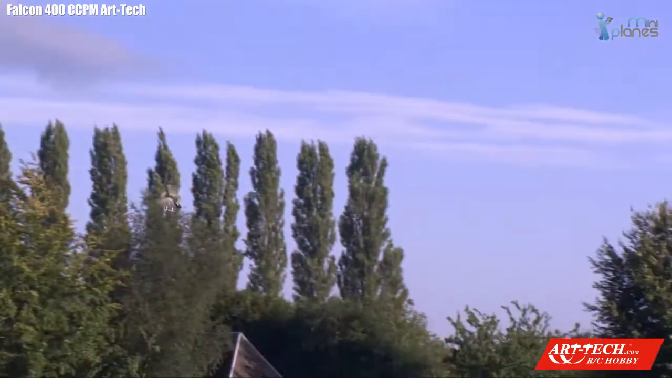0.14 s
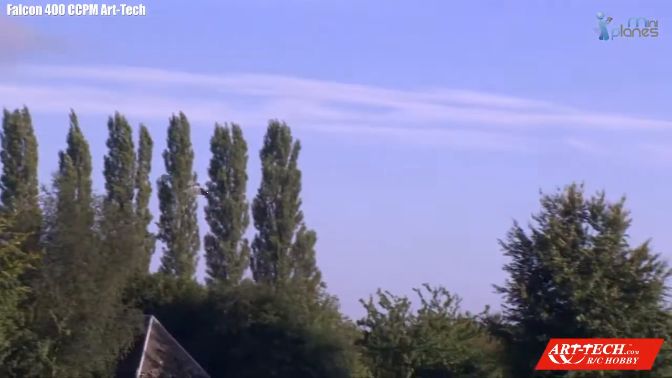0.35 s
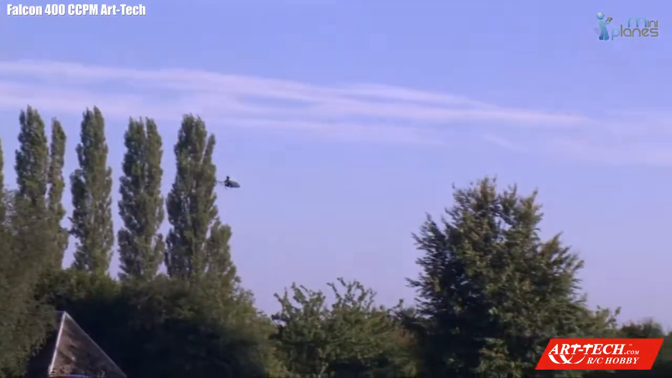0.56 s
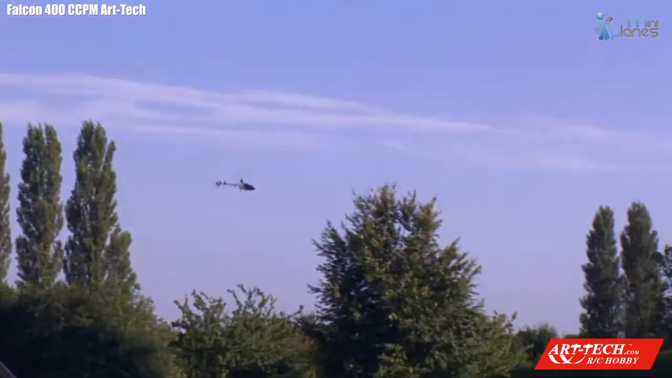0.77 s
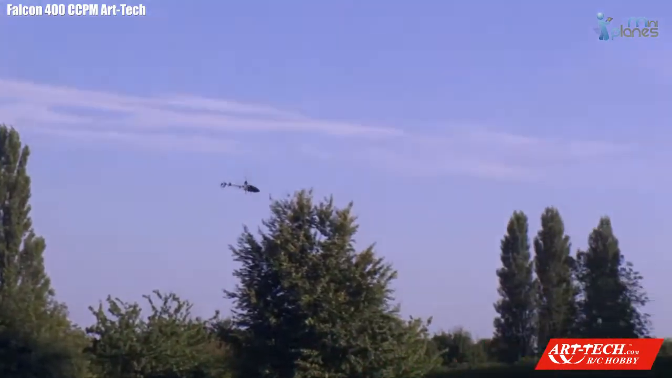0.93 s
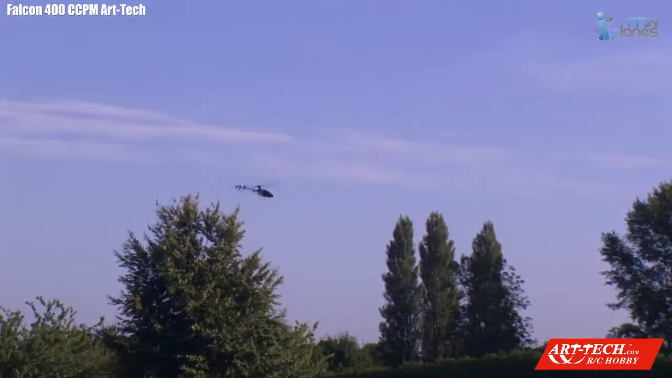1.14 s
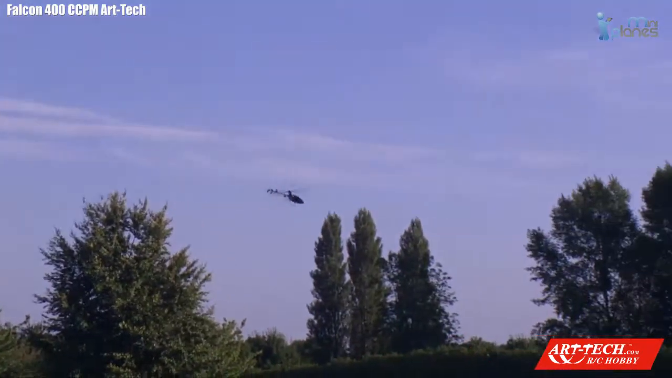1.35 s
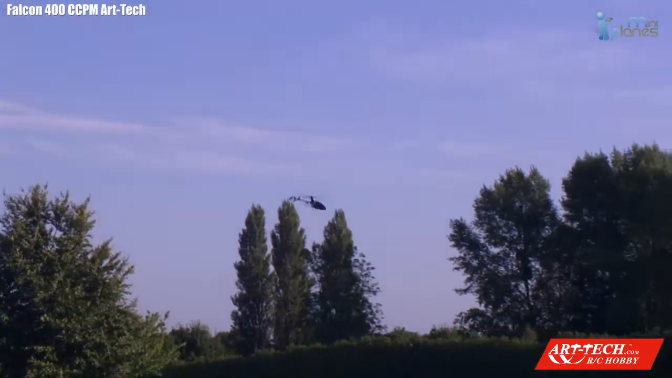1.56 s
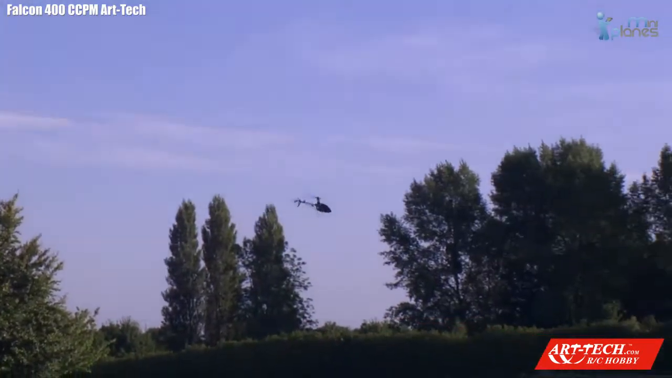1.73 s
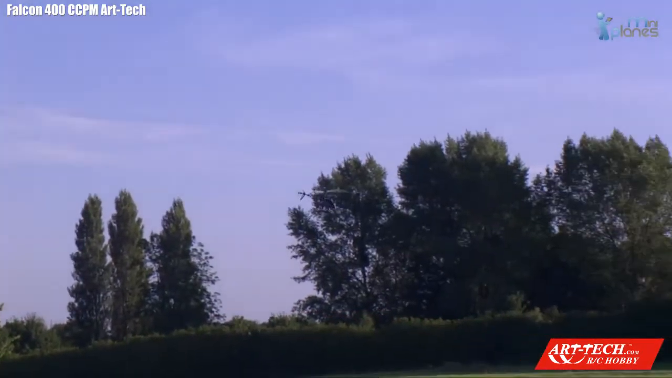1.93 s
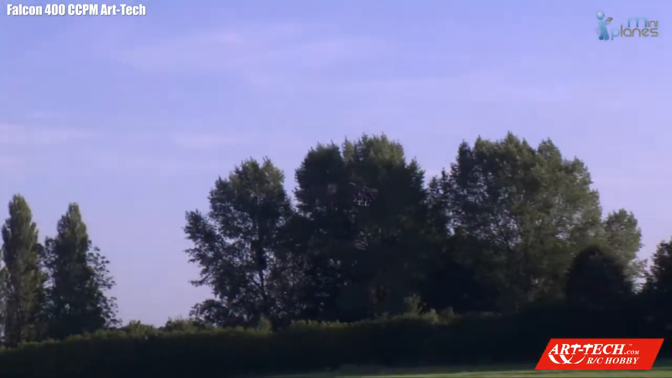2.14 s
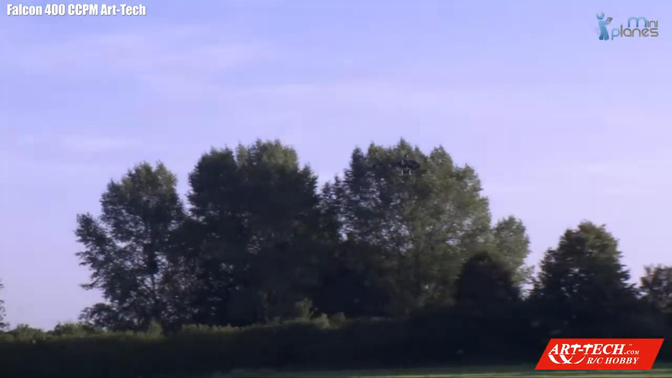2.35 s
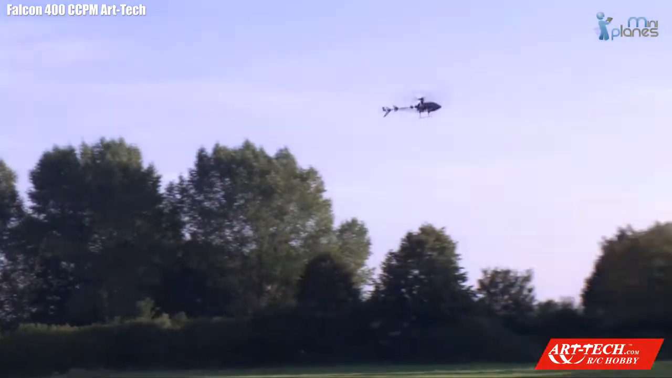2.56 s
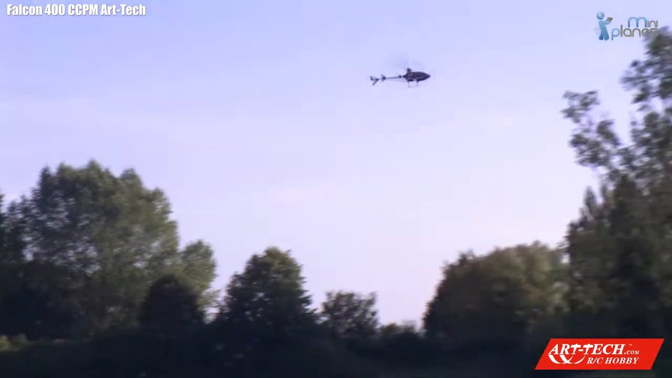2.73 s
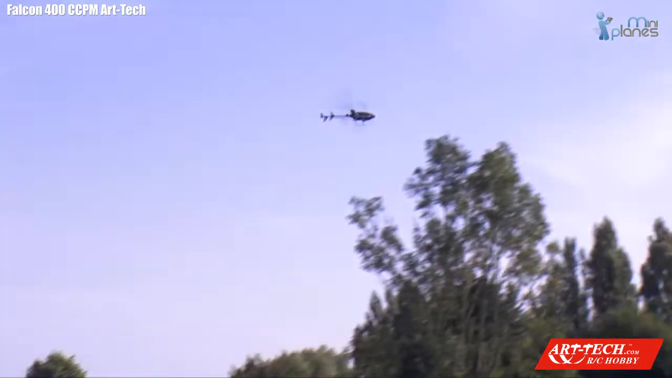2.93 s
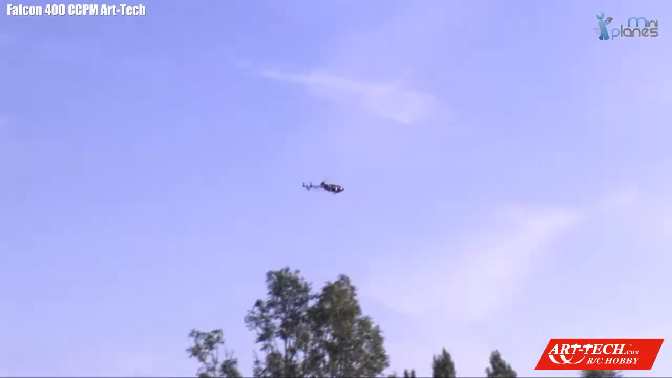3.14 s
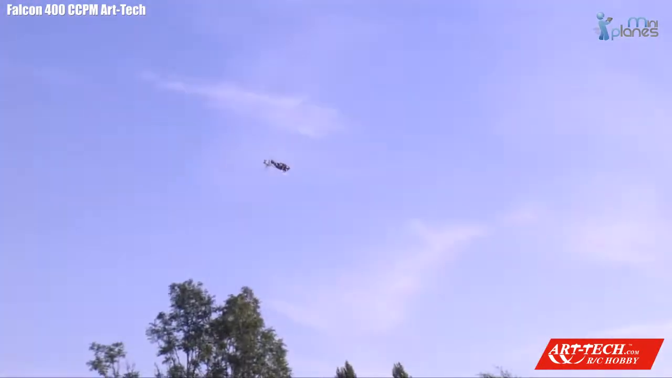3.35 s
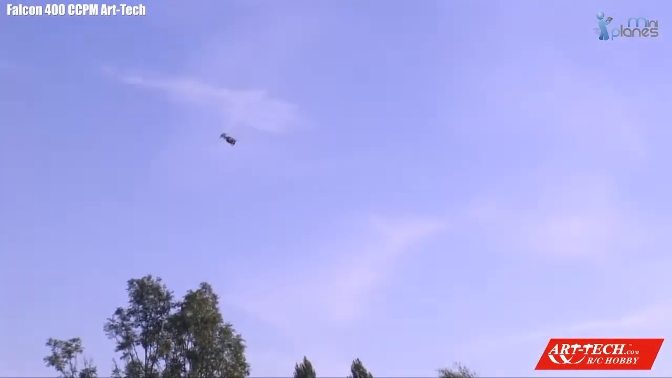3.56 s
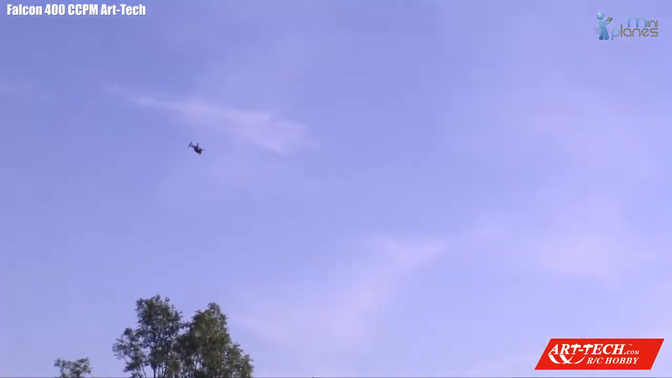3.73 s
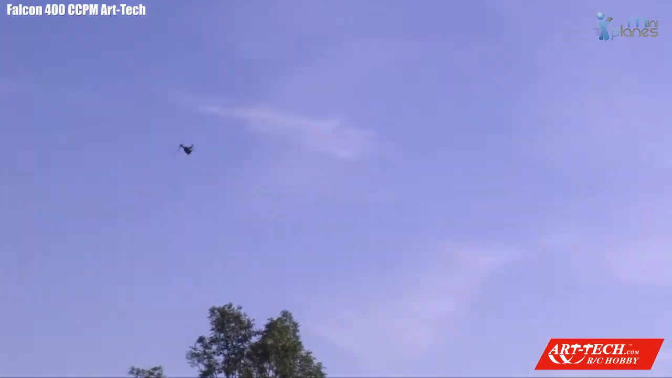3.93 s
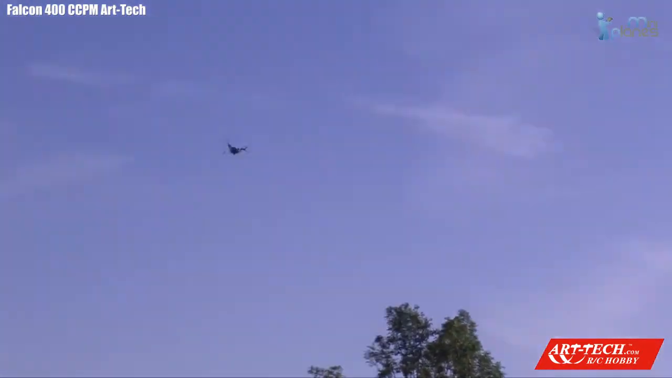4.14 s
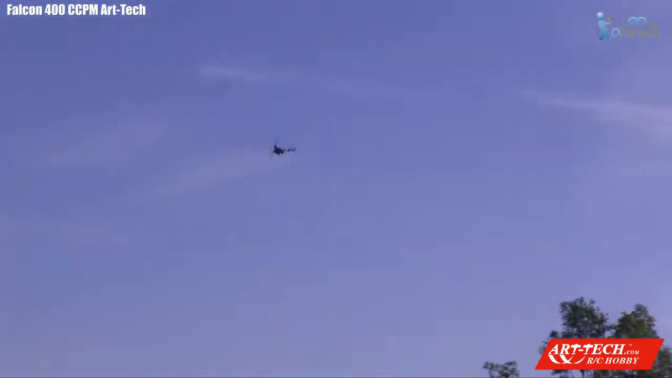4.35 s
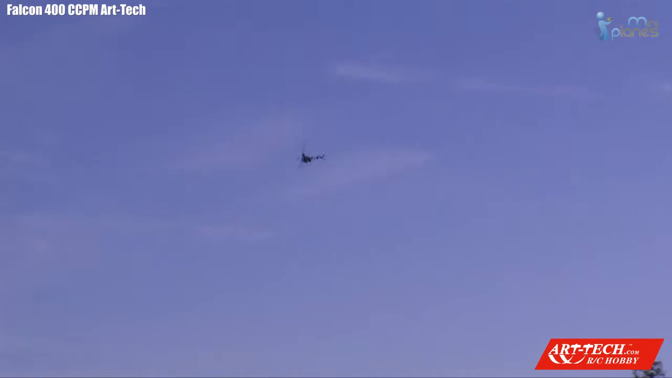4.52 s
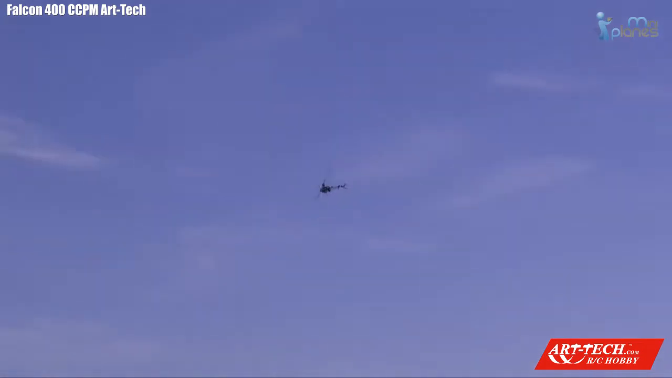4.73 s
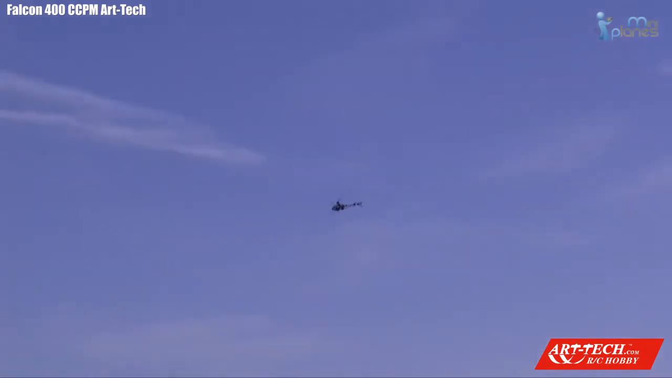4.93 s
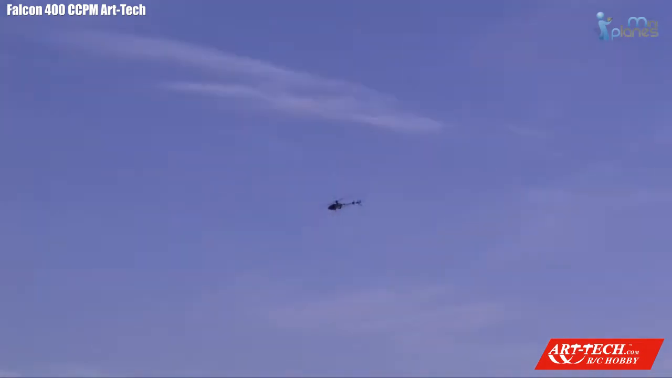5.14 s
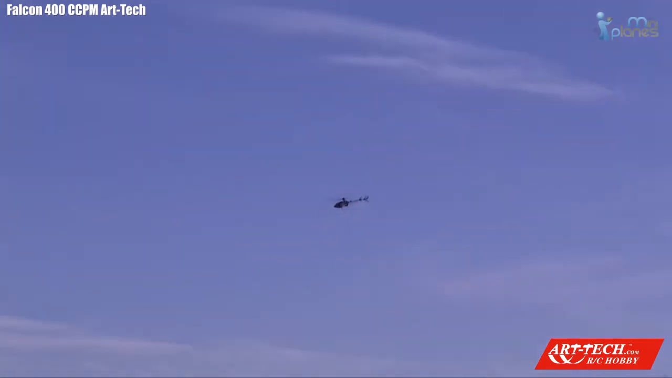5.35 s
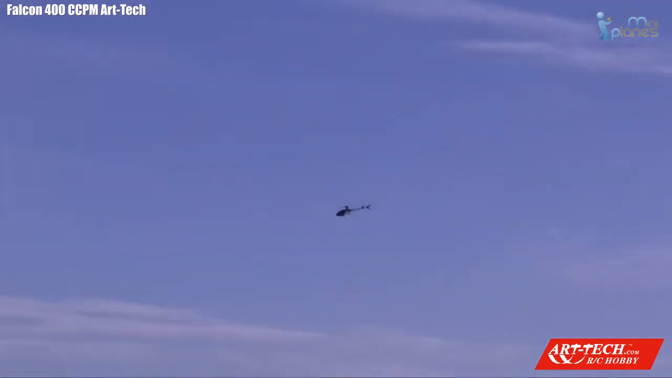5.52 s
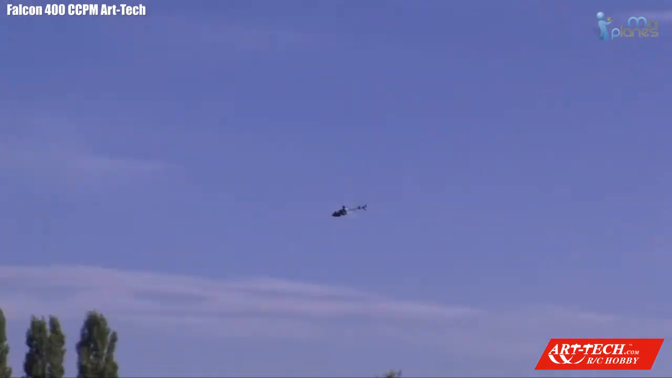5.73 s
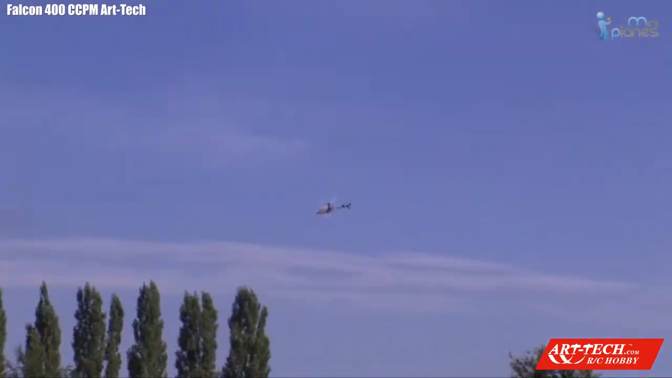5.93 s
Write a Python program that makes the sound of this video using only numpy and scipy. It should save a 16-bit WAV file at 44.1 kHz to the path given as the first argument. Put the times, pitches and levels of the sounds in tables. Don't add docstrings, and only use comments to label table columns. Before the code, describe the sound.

Shrill motor and gear whine rides on fluttering airy hiss as a toy-sized helicopter circles, while low gusts thump the microphone.

```python
import sys
import numpy as np
from scipy import signal
from scipy.fft import rfft, irfft, next_fast_len
from scipy.io import wavfile
from scipy.ndimage import uniform_filter1d, map_coordinates

SR = 44100
rng = np.random.default_rng(int(sys.argv[2]) if len(sys.argv) > 2 else 0)


def wav_record(signal):
    frames = np.transpose(np.atleast_2d(signal))
    bounded = np.clip(frames, -1, 1)
    quanta = np.round(bounded * 32767).astype(np.int16)
    wavfile.write(sys.argv[1], SR, quanta)


def attenuation_scalar(level_db):
    decades = np.asarray(level_db, float) / 20
    return 10 ** decades


N = 263718
MOTOR_TURNS_PER_ROTOR_TURN = 13.2

# time_s, speed_turns_per_s
SHAFT_SPEED = [(0, 560.4), (.36, 563.8), (.85, 541.8), (1, 540.2), (1.13, 541.6), (1.4, 538), (1.6, 538.4),
               (1.94, 558.6), (2.4, 558.8), (2.68, 534.5), (2.93, 522), (3.25, 525.9), (3.6, 531.8),
               (4.03, 536.9), (4.3, 532.6), (4.5, 525.2), (5.15, 525.4), (5.98, 548)]
# peak_s, level_db, lasts_s
MESH_LOBES = [(0, -53, .07), (.72, -54.5, 0.26), (1.1, -46.5, 0.17), (1.4, -46.5, 0.21),
              (1.64, -51.5, 0.11), (1.87, -49, 0.058), (2.33, -44.5, 0.068), (2.55, -44, 0.092),
              (3, -39.5, 0.048), (3.12, -36, 0.087), (3.38, -38.5, 0.1), (3.72, -45, 0.11),
              (4.15, -52, 0.22), (4.72, -51, 0.33), (5.02, -45, 0.081), (5.22, -48, 0.07),
              (5.31, -45, 0.048), (5.67, -53.5, .08), (5.9, -58, 0.13)]
FIFTH_LOBES = [(0, -56, 0.085), (.29, -48, 0.18), (.85, -61, 0.18), (1.15, -50.5, 0.17),
               (1.44, -51.5, 0.049), (1.66, -51, 0.1), (2.12, -56, 0.16), (2.33, -55, 0.059),
               (2.57, -55, .05), (2.69, -41.5, .1), (3, -45, 0.063), (3.2, -54, 0.21), (3.44, -46.5, 0.12),
               (3.95, -59, 0.13), (4.2, -60, 0.13), (4.5, -56, 0.12), (4.98, -53, 0.06),
               (5.14, -51.5, 0.078), (5.78, -54.5, 0.091), (5.98, -48.5, 0.083)]
HALF_LOBES = [(.05, -55, 0.14), (.52, -54, 0.11), (1, -60, .1), (1.33, -56, 0.15), (1.56, -48, 0.048),
              (1.78, -49.5, 0.16), (2.04, -48.5, 0.084), (2.33, -52, 0.049), (2.87, -60, .12),
              (3.15, -60, 0.13), (3.46, -56, .1), (3.67, -54, 0.061), (4.44, -55.5, 0.23), (4.8, -59, 0.22),
              (5.73, -56, 0.14)]
# peak_s, level_db, lasts_s
SHELL_8_LOBES = [
    (.2, -59, .33),
    (1.05, -64, 0.33),
    (2.06, -61.5, 0.23),
    (2.915, -53, 0.028),
    (3.65, -52, 0.054),
    (3.72, -50.5, .05),
    (3.82, -50, 0.14),
    (4.1, -58, 0.12),
    (5, -65, 0.19),
]
SHELL_9_LOBES = [
    (0, -51, 0.17),
    (1.8, -65, .14),
    (2.2, -62, .17),
    (2.62, -52.5, 0.12),
    (2.95, -57, .25),
    (3.37, -53, .13),
    (4.12, -54.5, .27),
    (4.65, -56, 0.31),
    (5.2, -57, .14),
    (5.62, -58, 0.14),
]
SHELL_12_LOBES = [
    (.22, -54, .17),
    (.66, -56, 0.36),
    (2.03, -49.5, 0.083),
    (2.28, -53.5, 0.17),
    (3, -64, .15),
    (3.42, -68, .2),
    (3.83, -52, 0.19),
    (4.16, -53, 0.21),
    (5.3, -54, .14),
    (5.72, -50, 0.22),
]
# shaft_order, level_db, peak_s, lasts_s
FAINT_TONES = [(1, -51, 2.5, .25), (1, -56, 1.95, .25), (1, -56, .15, .28), (1, -64, 1.2, .25),
               (1.102, -56, 2.05, .3), (1.102, -58, 1.2, .3), (.828, -62, .3, .35), (.828, -64, 1.25, .2),
               (.828, -63, 2.05, .3), (1.21, -62, 1.8, 1.5), (2.2, -62, 2.1, .35), (2, -59, 2.75, .3),
               (4, -61, 3.2, .8), (4, -63, .3, .5), (6, -64, 4.2, .4), (10.3, -56, 4.65, .18),
               (9.39, -57, 3.5, .4), (10.39, -59, 3.2, .6), (10.61, -60, 4.2, .8), (10.61, -61, .3, .4),
               (11, -60, 1.9, .6), (11, -62, .3, .4), (11, -63, 5.3, .7), (11.61, -63, 3.2, .4),
               (12.61, -63, 3, 1), (12.61, -61, 5.8, .4), (13, -57, 2.9, .4), (13, -59, 1.6, .5),
               (13, -59, 5.8, .4), (14, -62, 2.8, .4), (18, -66, 2.3, .3), (18, -66, 3.5, .3),
               (20, -60, 3.7, .35), (21, -64, 3.6, .25), (6, -59, 2.55, .15), (7, -63, 4.9, .4),
               (7, -66, .75, .2), (4.5, -62, 3.9, .3), (5.21, -60, 4.05, .15), (9.5, -58, 2.25, .15),
               (9.5, -58, 5.85, .15), (9.71, -60, 4.65, .15), (11.58, -60, .75, .2), (14, -60, 1.05, .15),
               (17.4, -64, 2.1, .3), (17.4, -63, 3.45, .15), (18, -65, .4, .4), (18, -64, 4.4, .25),
               (19, -61, 3.45, .15), (22, -61, 3.7, .25)]
# shaft_order, width_hz, level_db, peak_s, lasts_s
PANEL_HISS = [
    (14.6, 1100, -47, 2.8, 0.34),
    (4.25, 130, -52.5, 2.94, 0.39),
    (5.4, 99, -56, 3.9, 0.48),
    (12.4, 400, -48, 2.44, 0.15),
    (3.3, 390, -58, 1.62, 1),
]
MESH_DROPOUTS = [1.04, 1.25, 1.4, 2.44, 2.96, 3.085, 3.22, 3.26, 3.41, 3.54, 3.58, 5.125]
# freq_hz, density_db
HUM_SPECTRUM = [(300, -30), (480, -3), (600, 5), (720, -0.5), (900, -57)]
BLADE_SPECTRUM = [(250, -6), (500, -13.5), (1000, -2), (1700, -6), (2300, -2.5), (2750, -2), (3300, -5),
                  (4000, -7), (5000, -32.5)]
GEAR_HISS_SPECTRUM = [(3600, -18.5), (4400, -6.5), (5300, 0.5), (6000, -2.5), (6800, 0.5), (7800, -4),
                      (8800, -5), (9800, -10.5)]
TIP_SPECTRUM = [(7500, -1), (9000, -6), (10000, 2), (11000, 3.5), (12500, -5)]
# time_s, nearness_db
FLIGHT_PATH = [(0, -0.5), (.45, .5), (.6, -1.5), (1.05, 0), (1.2, 1), (1.4, -1.5), (1.95, 2), (3.1, 2),
               (3.3, -1.5), (3.45, 0), (3.6, -3.5), (4.7, -5.5), (5.4, -3), (5.98, -2)]
# peak_s, gear_hiss_db, tip_hiss_db, lasts_s
DISC_TILTS = [(0, -48, -57, 0.2), (0.305, -46, -54.5, 0.21), (0.79, -51, -54.5, 0.23),
              (1.17, -45, -51.5, 0.22), (1.498, -56, -54, 0.15), (1.623, -43.5, -52.5, 0.12),
              (1.97, -46.5, -52.5, 0.17), (2.51, -41.5, -49.5, 0.21), (2.9, -46.5, -49, 0.087),
              (3.108, -40.5, -52, 0.2), (3.425, -41, -50.5, 0.11), (3.73, -45, -48.5, 0.16),
              (4.047, -49.5, -66, 0.14), (4.35, -50.5, -57.5, 0.32), (4.71, -54, -52.5, 0.16),
              (5, -48, -56, 0.069), (5.16, -44, -58, 0.045), (5.545, -50, -56, 0.073),
              (5.838, -51.5, -76, .08)]
# freq_hz, level_re_shared_db
SCATTER_SPECTRUM = [(60, -7), (340, -22), (620, -44), (1100, -13), (1980, -34), (3540, -32), (5200, -17),
                    (7500, -13.5), (9300, -4), (10500, -2.5), (11300, -4), (12200, -8)]
# time_s, extra_delay_ms, strength_db
GRASS_PATH = [(0, 1.47, -1), (.5, 1.36, -2), (1.3, 1.45, -1), (2.1, 1.36, -2), (2.6, 1.9, -3),
              (3.2, 2.58, 0), (3.6, 2.78, 2), (4, 2.85, 2.5), (4.6, 2.8, 3), (5, 2.7, 4), (5.4, 2.45, 3),
              (5.98, 2.2, 4)]
# freq_hz, gain_db
GRASS_RESPONSE = [(20, -11), (1500, -8), (2600, -7), (3600, -9.5), (6000, -14), (13000, -20)]
# freq_hz, density_db
FIELD_SPECTRUM = [(15, -51), (28, -24), (60, -6), (181, -4), (384, -6.5), (642, -2.5), (830, -3),
                  (1730, -9), (2000, -9.5), (2600, -42), (4400, -120)]
# peak_s, thud_db, flutter_db, lasts_s
GUST_SWELLS = [(1.444, -66, -83, 0.53), (2.493, -48, -60, 0.091), (2.69, -41, -43, 0.048),
               (2.85, -26.5, -34.5, 0.056), (3.009, -30.5, -21.5, 0.066), (3.132, -31, -31, 0.057),
               (3.275, -37, -39.5, 0.013), (3.381, -28.5, -26, 0.036), (3.447, -34, -25.5, 0.025),
               (3.54, -34, -35, .04), (3.621, -30, -28.5, 0.024), (3.705, -31, -26.5, 0.016),
               (3.826, -28.5, -27, 0.09), (4.006, -31.5, -39, 0.067), (4.185, -34, -50, 0.11),
               (4.344, -36.5, -40, 0.068), (4.486, -43, -50, 0.079), (4.772, -44, -49, 0.022),
               (4.927, -54.5, -58, .07), (5.27, -59, -58, 0.056), (5.536, -50.5, -54.5, 0.17),
               (5.98, -43, -48, 0.033)]
# freq_hz, density_db
THUD_SPECTRUM = [(20, -40), (50, -20), (90, -3.5), (130, 0.5), (180, -7), (260, -13.5)]
FLUTTER_SPECTRUM = [(110, -26), (170, 4), (230, 0), (340, -7.5), (450, -17.5), (650, -23), (1000, -42),
                    (1500, -46)]
# time_s, peak_db, pitch_hz, port_sign (+1 left, -1 right)
EDDY_POPS = [(2.8415, -16.5, 298, 1), (2.8766, -15, 450, -1), (2.965, -12, 252, -1), (2.98, -16, 282, 1),
             (3.0329, -11, 326, 1), (3.3627, -19, 280, -1), (3.3873, -16, 292, -1), (3.414, -31, 300, 1),
             (3.5989, -8, 232, -1), (3.623, -17, 330, -1), (3.7041, -16, 248, -1), (3.709, -16, 248, 1),
             (3.841, -19, 200, -1), (3.046, -10.5, 250, 1), (3.108, -18, 220, -1), (3.444, -18, 219, -1),
             (3.968, -28, 150, 1), (4.017, -28, 160, -1), (4.248, -26, 140, 1), (4.349, -24, 215, -1),
             (2.993, -17, 230, 1), (3.02, -18, 260, -1), (4.954, -38, 310, 1), (5.385, -34, 170, -1),
             (3.788, -21, 231, -1)]
# freq_hz, gain_db
LEFT_CAPSULE = [(5, 0), (7500, .1), (9500, 1.5), (10800, .1), (22000, .1)]
RIGHT_CAPSULE = [(5, 0), (7500, -.1), (9500, -1.5), (10800, -.1), (22000, -.1)]


def unit(x):
    return x / np.sqrt(np.mean(x ** 2) + 1e-20)


def curves(rows):
    time_s, *columns = np.transpose(rows)
    return [np.interp(np.arange(N) / SR, time_s, column) for column in columns]


def wobble(rate_hz):
    knots = rng.standard_normal(int(N * rate_hz / SR) + 4)
    return map_coordinates(knots, [np.arange(N) * rate_hz / SR])


def fade(peak_s, lasts_s):
    return -np.minimum(6 * ((np.arange(N) / SR - peak_s) / lasts_s) ** 2, 40)


def lobes(rows, floor_db=-84):
    peak_s, level_db, lasts_s = np.transpose(rows)[:, :, None]
    coarse_s = np.arange(0, N, 128) / SR
    swells_db = level_db - 4.47 * ((coarse_s - peak_s) / lasts_s) ** 2
    power = np.sum(attenuation_scalar(swells_db) ** 2, axis=0)
    return 10 * np.log10(np.interp(np.arange(N) / SR, coarse_s, power) + attenuation_scalar(floor_db) ** 2)


def coloured(x, points):
    size = next_fast_len(N + 8192)
    hz, db = np.transpose(points)
    log_hz = np.log(np.fft.rfftfreq(size, 1 / SR) + 1)
    gain = attenuation_scalar(np.interp(log_hz, np.log(hz + 1), db, -90, -90))
    return irfft(rfft(x, size) * gain, size)[..., :N]


def patchy(patch_db):
    noise = signal.stft(rng.standard_normal((2, N)), nperseg=512)[2]
    patches = uniform_filter1d(rng.standard_normal(noise.shape[1:]), size=16, axis=0)
    patches = uniform_filter1d(patches, size=10, axis=1)
    return signal.istft(noise * attenuation_scalar(patch_db * unit(patches)), nperseg=512)[1][:, :N]


def whine(turns, air_db):
    rotor = 2 * np.pi * turns / MOTOR_TURNS_PER_ROTOR_TURN

    def tone(order, level_db, swell, flutter_db):
        phase = 0.079 * order * wobble(26) + rng.uniform(0, 2 * np.pi)
        turn = rotor + .3 * wobble(16)
        once = (1 + .3 * wobble(9)) * np.cos(turn)
        twice = .7 * np.cos(2 * turn + 2 * wobble(3))
        beat = 1 + swell * (once + twice)
        phase += .6 * swell * wobble(3) * np.sin(turn)
        gain = np.sqrt(2) * attenuation_scalar(level_db + 0.42 * air_db + flutter_db * wobble(24.85))
        return gain * beat * np.sin(2 * np.pi * order * turns + phase)

    mesh_db = lobes(MESH_LOBES, -68)
    for time_s in MESH_DROPOUTS:
        mesh_db = mesh_db - 12 * attenuation_scalar(fade(time_s, lasts_s=0.016))
    out = tone(5, lobes(FIFTH_LOBES, -63) - 2, swell=.58, flutter_db=1.8)
    out += tone(10, mesh_db, swell=.26, flutter_db=1.5)
    out += tone(5.5, lobes(HALF_LOBES, -78) - 2, swell=.3, flutter_db=2.6)
    for order, rows in ((8, SHELL_8_LOBES), (9, SHELL_9_LOBES), (12, SHELL_12_LOBES)):
        out += tone(order, lobes(rows), swell=.15, flutter_db=.9)
    for order, level_db, peak_s, lasts_s in FAINT_TONES:
        out += tone(order, level_db + fade(peak_s, lasts_s), swell=0.13, flutter_db=1)
    for order, width_hz, level_db, peak_s, lasts_s in PANEL_HISS:
        gain = np.sqrt(2) * attenuation_scalar(level_db + fade(peak_s, lasts_s))
        out += gain * wobble(width_hz) * np.sin(2 * np.pi * order * turns)
    return out


def rush(turns, air_db):
    rotor = 2 * np.pi * turns / MOTOR_TURNS_PER_ROTOR_TURN
    once, twice = np.cos(rotor), np.cos(2 * rotor + 0.27)
    chop_db = once + 0.6 * twice
    slap_db = .9 * twice + .2 * once
    near_db, = curves(FLIGHT_PATH)
    gear_rows = [(s, db, lasts) for s, db, _, lasts in DISC_TILTS]
    tip_rows = [(s, db, lasts) for s, _, db, lasts in DISC_TILTS]
    gear_db = lobes(gear_rows, -49 + 0.13 * near_db)
    tip_db = lobes(tip_rows, -56.5 + .25 * near_db)
    layers = [  # spectrum, level_db, patch_db
        (HUM_SPECTRUM, -55.5 + near_db + 0.58 * chop_db, 1.2),
        (BLADE_SPECTRUM, -48 + near_db + slap_db + .15 * air_db, 1.1),
        (GEAR_HISS_SPECTRUM, gear_db + 0.8 * chop_db + air_db, 1.5),
        (TIP_SPECTRUM, tip_db + 0.67 * chop_db + air_db, 1.5)]
    out = np.zeros((2, N))
    for spectrum, level_db, patch_db in layers:
        out += attenuation_scalar(level_db) * unit(coloured(patchy(patch_db), spectrum))
    return out


def grass(x):
    delay_ms, echo_db = curves(GRASS_PATH)
    source_sample = np.arange(N) - (delay_ms + .022 * wobble(8)) * SR / 1000
    echo = np.array([map_coordinates(part, [source_sample], mode="nearest") for part in x])
    return x + attenuation_scalar(echo_db) * coloured(echo, GRASS_RESPONSE)


def field():
    left, right, common = unit(coloured(rng.standard_normal((3, N)), FIELD_SPECTRUM))
    level = attenuation_scalar(-58.5 + 0.2 * wobble(3.5))
    return level * np.array([left + 1.08 * common, right + 1.2 * common])


def wind():
    out = np.zeros((2, N))
    thud_db = lobes([(s, db, lasts) for s, db, _, lasts in GUST_SWELLS], -73)
    flutter_db = lobes([(s, db, lasts) for s, _, db, lasts in GUST_SWELLS], -93)
    for level_db, spectrum in ((thud_db, THUD_SPECTRUM), (flutter_db, FLUTTER_SPECTRUM)):
        lumps = attenuation_scalar(2.3 * wobble(45) + 2.0 * np.array([wobble(30), wobble(30)]))
        noise = unit(coloured(lumps * rng.standard_normal((2, N)), spectrum))
        mid, side = attenuation_scalar(level_db - 2) * noise
        out += np.array([side + attenuation_scalar(-10.0) * mid, attenuation_scalar(-6.0) * mid - side])
    t = np.arange(-600, 600) / SR
    for time_s, peak_db, pitch_hz, port_sign in EDDY_POPS:
        push = attenuation_scalar(peak_db) * np.cos(2 * np.pi * pitch_hz * t) * np.exp(-(1.85 * pitch_hz * t) ** 2)
        port_gains = [1, -.55] if port_sign > 0 else [-.55, 1]
        start = round(time_s * SR) - 600
        out[:, start:start + len(t)] += np.outer(port_gains, push)
    return out


def scene():
    turns = np.cumsum(uniform_filter1d(curves(SHAFT_SPEED)[0], size=3000)) / SR
    air_db = 0.4 * wobble(3.58) + 1.12 * wobble(11)
    tones = whine(turns, air_db)
    shared, scattered = grass(rush(turns, air_db)) * attenuation_scalar(-0.5)
    side = coloured(scattered, SCATTER_SPECTRUM) + 0.097 * np.gradient(tones)
    aside_db, front_db, swing_s = 14, -3.5, 0.8
    treble = coloured(side, [(2500, -42), (4500, 0), (8500, 6.5), (10500, -20)])
    treble_db = front_db + aside_db * np.exp(-np.arange(N) / SR / swing_s)
    side = side + (attenuation_scalar(treble_db) - 1) * treble
    return np.array([shared + tones + side, shared + tones - side]) + field() + wind()


def band_gate(left, right, hole_db, narrow_db):
    hz, _, (mid, side) = signal.stft(np.array([left + right, left - right]) / 2, SR, nperseg=2048)

    def level_db(z, bins):
        power = uniform_filter1d(uniform_filter1d(abs(z) ** 2, bins, 0), size=2, axis=1)
        return 10 * np.log10(abs(power) + 1e-20)

    def gate(margin_db):
        return 1 / (1 + np.exp(-np.clip(4 * margin_db, -30, 30)))

    typical_db = np.median(level_db(mid, 3)[(hz > 1500) & (hz < 11000)], axis=0)
    whim_db = uniform_filter1d(rng.standard_normal((2,) + mid.shape), size=2, axis=2)
    bins = np.arange(len(hz))
    narrow = bins // 4 * 4
    wide = np.minimum(bins // 14 * 14 + 7, len(hz) - 1)
    mid_margin_db = level_db(mid, 4) - typical_db - hole_db + 1.5 * whim_db[0, narrow]
    side_margin_db = (level_db(side, 14) - typical_db - narrow_db - 3.5 + 4.5 * whim_db[1])[wide]
    side_margin_db = np.minimum(side_margin_db, level_db(side, 4) - typical_db - narrow_db + 3)
    mid = mid * np.where(abs(hz[:, None] - 6500) < 4700, gate(mid_margin_db), 1)
    side = side * np.where(hz[:, None] > 800, gate(side_margin_db), 1)
    mid, side = signal.istft(np.array([mid, side]), SR, nperseg=2048)[1][:, :N]
    return np.array([mid + side, mid - side])


def top_cut(x):
    return signal.sosfilt(signal.butter(12, 12010, fs=SR, output="sos"), x)


def record(dry):
    left = coloured(dry[0], LEFT_CAPSULE)
    right = coloured(dry[1], RIGHT_CAPSULE)
    mix = band_gate(left, right, hole_db=-4.5, narrow_db=-13)
    return top_cut(mix)


dry = scene()
out = record(dry)
wav_record(out)
```